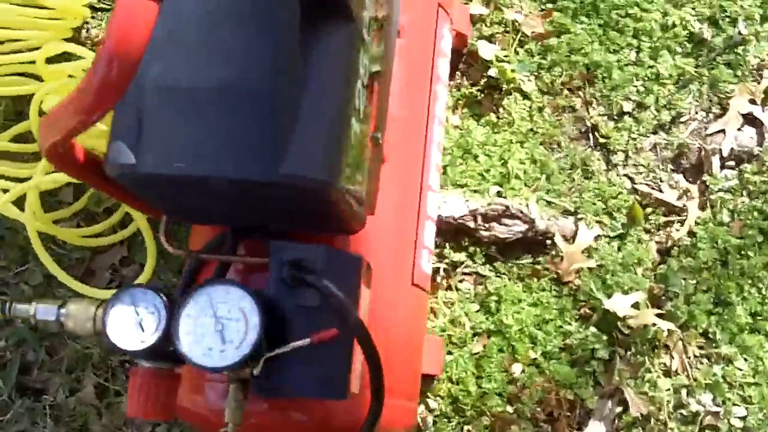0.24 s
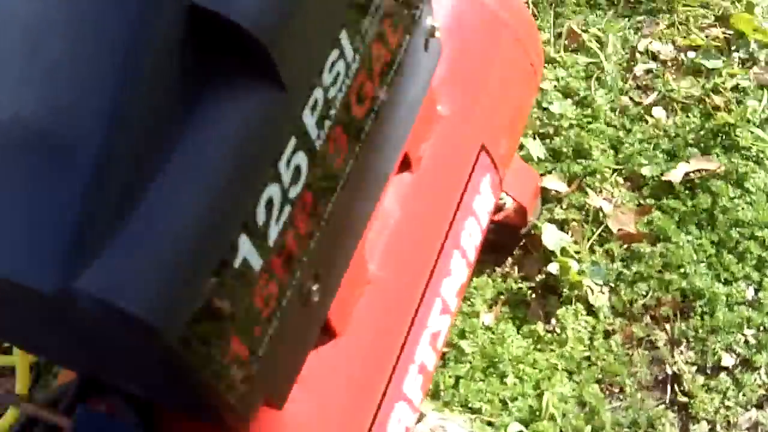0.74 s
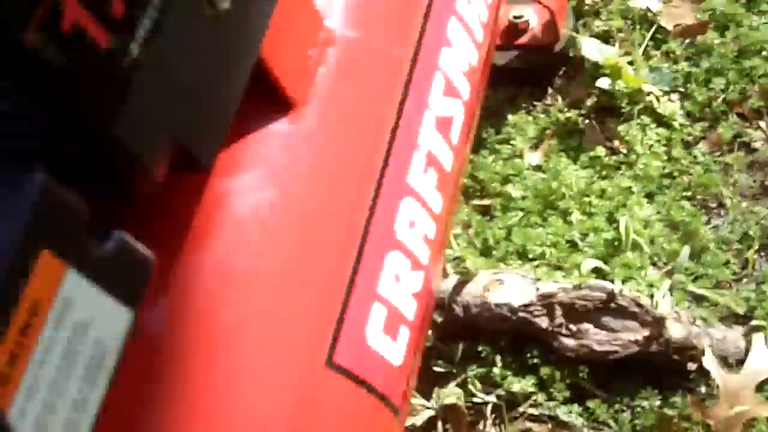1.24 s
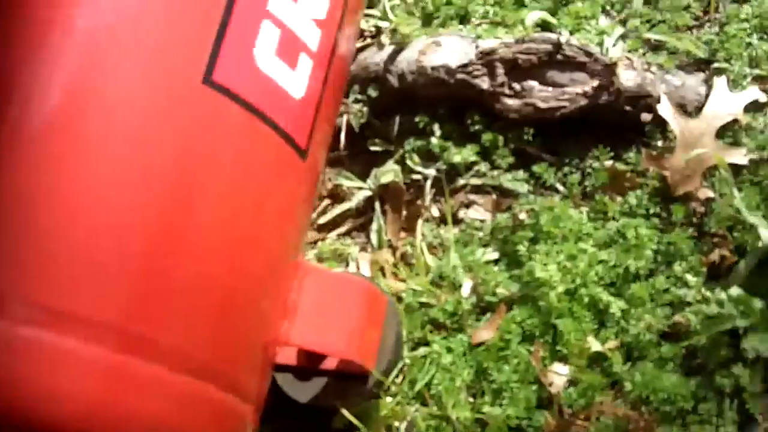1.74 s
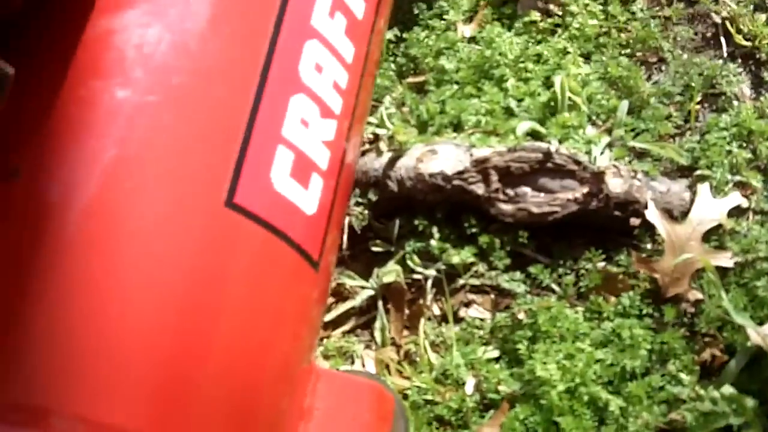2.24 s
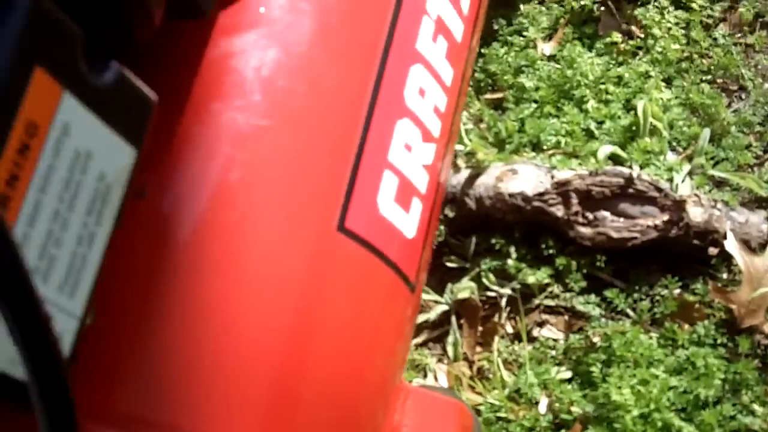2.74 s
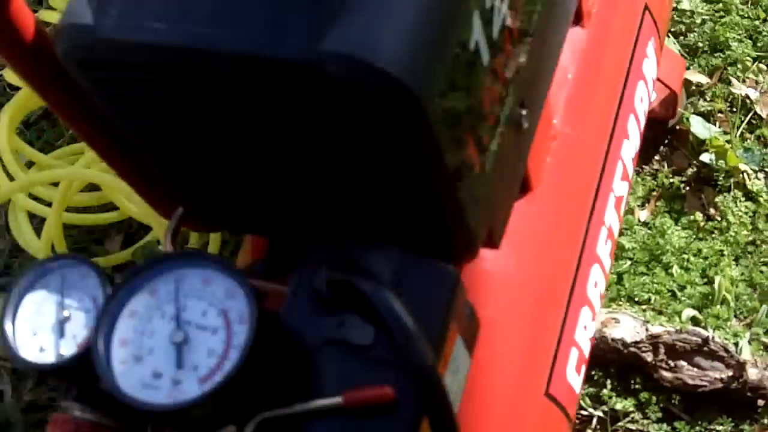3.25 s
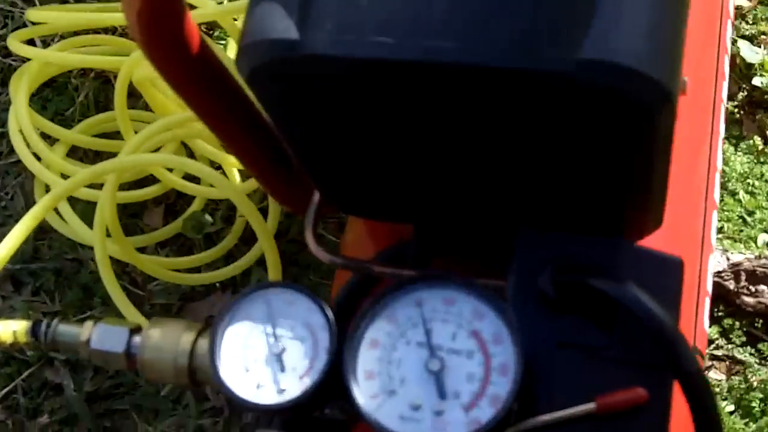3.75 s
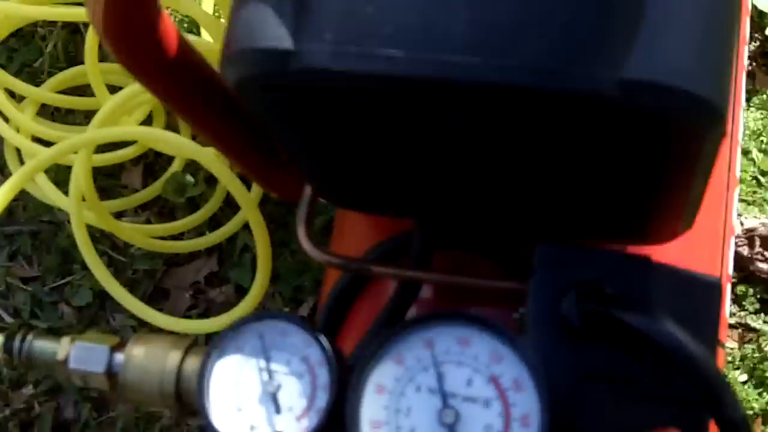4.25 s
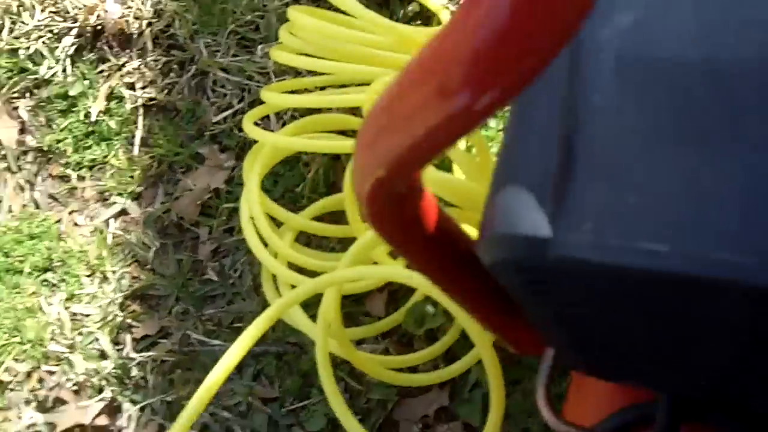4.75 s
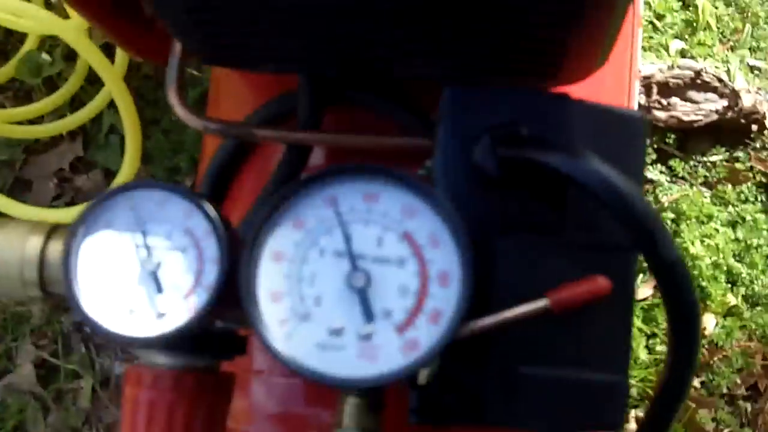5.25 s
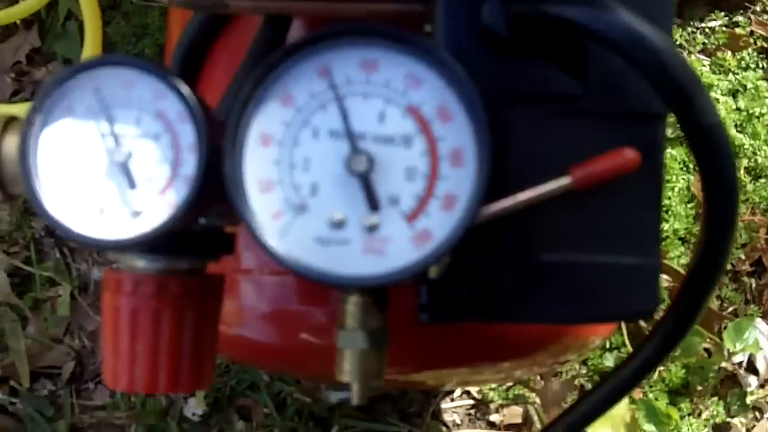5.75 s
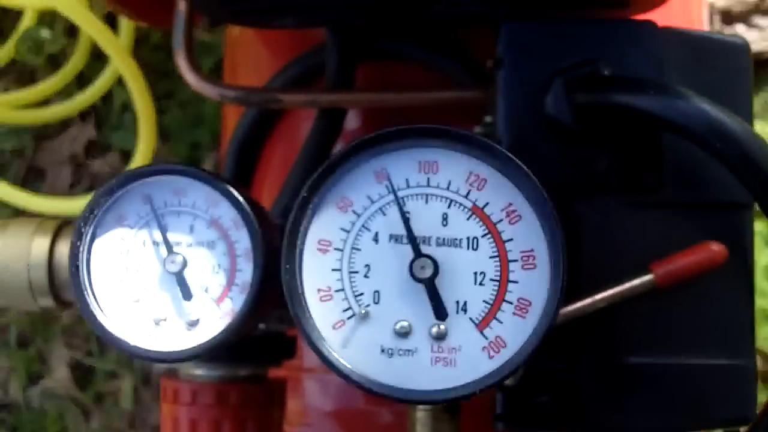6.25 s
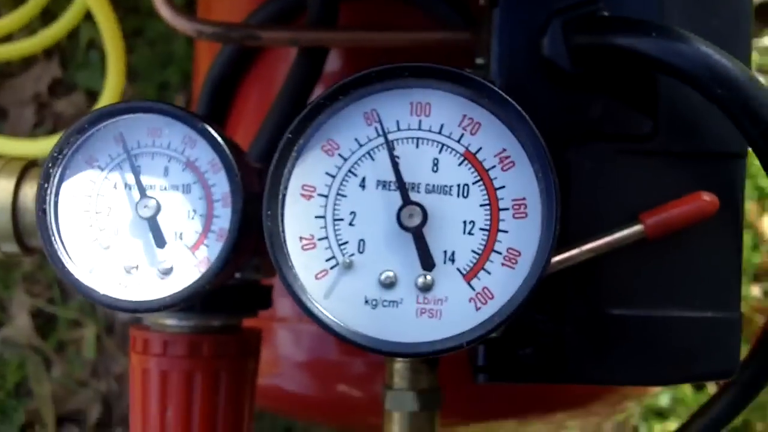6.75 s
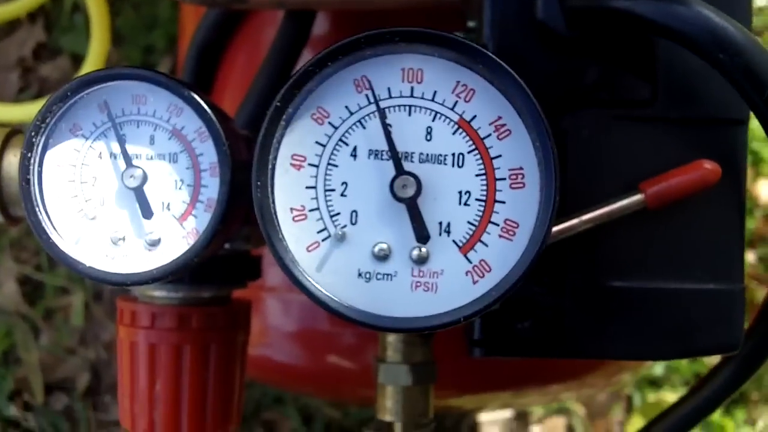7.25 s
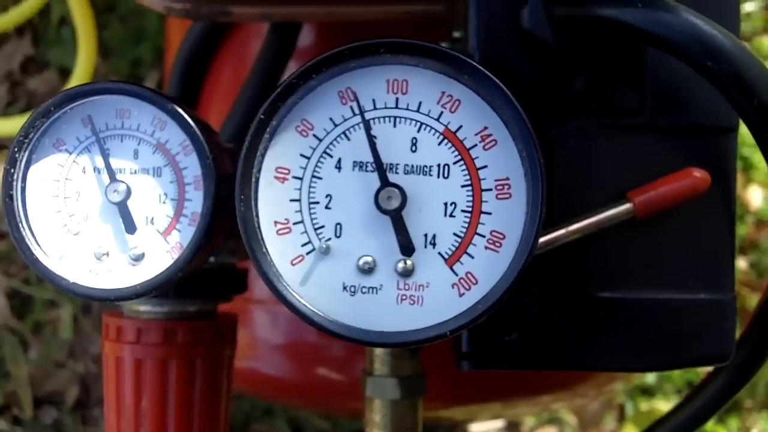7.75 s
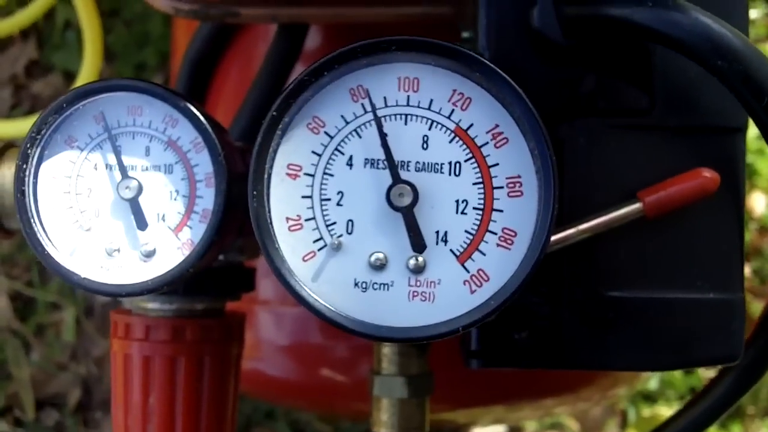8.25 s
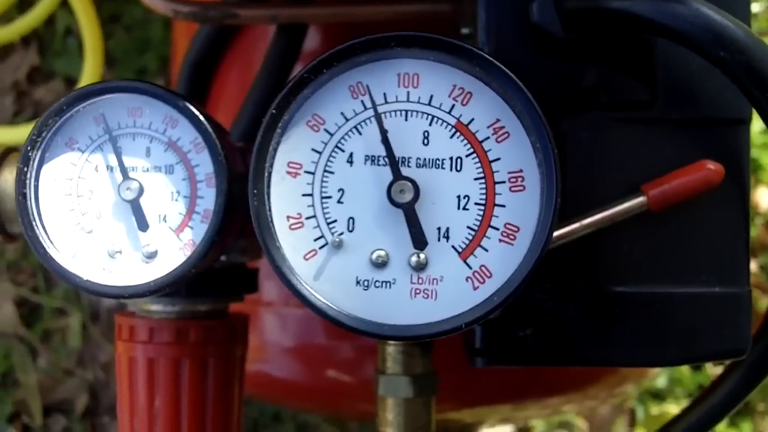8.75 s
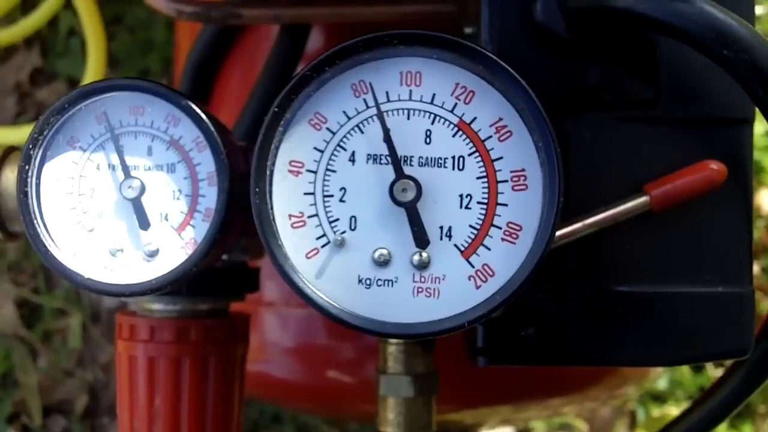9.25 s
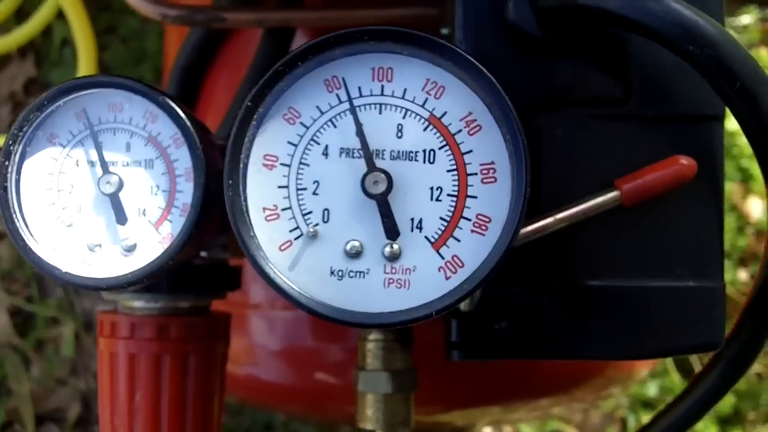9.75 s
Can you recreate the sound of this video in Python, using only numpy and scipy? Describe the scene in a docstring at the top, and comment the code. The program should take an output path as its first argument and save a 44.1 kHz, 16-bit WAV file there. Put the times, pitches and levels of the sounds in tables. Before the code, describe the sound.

A small piston air compressor runs nonstop outdoors on grass, a fast rattling drone with reedy flutter, buzz and airy hiss. The close handheld microphone moves from above the pump along the motor and tank, then back to the gauges, where the hum becomes fuller and less hissy. A sharp click on the microphone body past the middle briefly dips the level; faint breeze rumbles underneath.

```python
"""A small oil-free air compressor putters and hisses on a lawn, with one sharp click along the way.
Its piston turns about 57 times a second. Each turn gives a puff of pressure, a burst of reed-valve flutter
and buzz, a rattle and a hiss of air; these are built from crank harmonics, shaped noise and ringing modes.
The microphone moves from above the pump, past the motor, to the side of the tank, then past the motor again
to the motor cover and the gauges. A light breeze blows on it, and the click makes its limiter duck."""
import sys
import numpy as np
from scipy import signal
from scipy.fft import rfft, irfft, next_fast_len
from scipy.io import wavfile

SR = 44100
rng = np.random.default_rng(int(sys.argv[2]) if len(sys.argv) > 2 else 0)


def generate_wav(signal):
    """Clip the signal to [-1, 1] and save it as 16-bit WAV at the path in sys.argv[1]."""
    frames = np.transpose(np.atleast_2d(signal))
    scaled = np.clip(frames, -1, 1) * 32767
    pcm = np.round(scaled).astype(np.int16)
    wavfile.write(sys.argv[1], SR, pcm)


N = 440559

# How fast the crank turns: t/s, speed/(turns per s)
CRANK_SPEED = [(0.0, 57.125), (0.5, 56.928), (1.4, 56.82), (3.0, 56.84), (5.0, 56.838), (7.5, 56.843),
               (9.99, 56.848)]
# The drone heard at each place: multiple of the crank speed, relative level/dB
DRONE_ABOVE_PUMP = [(1, -6), (2, -7), (3, -8), (4, -22), (5, -11), (6, -6), (7, -5), (8, -8), (9, -7),
                    (10, -11), (11, -7), (12, -4), (13, -3), (14, 0), (15, -6), (16, -22), (17, -14),
                    (18, -17), (19, -14), (20, -11), (21, -17), (22, -16), (23, -13), (24, -13), (25, -14),
                    (26, -19), (27, -22), (28, -26)]
# the same columns, beside the tank
DRONE_BESIDE_TANK = [(1, -11), (2, -6), (3, -9), (4, -23), (5, -20), (6, -15), (7, -7), (8, -16), (9, -13),
                     (10, -2), (11, -5), (12, 0), (13, -1), (14, -9), (15, -22), (16, -12), (17, -22),
                     (18, -25), (19, -25), (20, -24), (21, -16), (22, -16), (23, -16), (24, -20), (25, -18),
                     (26, -24), (27, -25), (28, -25), (29, -21), (30, -28), (31, -27)]
# the same columns, at the motor cover
DRONE_AT_COVER = [(1, -15), (2, -12), (3, -15), (4, -25), (5, -16), (6, -13), (7, -13), (8, -18), (9, -24),
                  (10, -19), (11, -13), (12, -3), (13, 0), (14, -7), (15, -18), (16, -15), (17, -20),
                  (18, -25), (19, -29), (20, -25), (21, -27), (22, -24), (23, -29), (24, -25), (25, -25),
                  (26, -23), (27, -24), (28, -27), (29, -24), (30, -25), (31, -31), (32, -33), (33, -30),
                  (34, -29)]
# the same columns, at the gauges
DRONE_AT_GAUGES = [(1, -16), (2, -12), (3, -14), (4, -23), (5, -18), (6, -14), (7, -13), (8, -17), (9, -25),
                   (10, -10), (11, -9), (12, -3), (13, 0), (14, -7), (15, -14), (16, -13), (17, -17),
                   (18, -24), (19, -25), (20, -19), (21, -24), (22, -29), (23, -23), (24, -29), (25, -22),
                   (26, -18), (27, -21), (28, -32), (29, -25), (30, -29), (31, -34), (32, -32), (33, -28),
                   (34, -30), (35, -29), (36, -29), (37, -34)]
# the same columns, beside the motor
DRONE_BESIDE_MOTOR = [(1, -13), (2, -8), (3, -13), (4, -23), (5, -15), (6, -11), (7, -8), (8, -14),
                      (9, -12), (10, -11), (11, -10), (12, -5), (13, 0), (14, -4), (15, -14), (16, -20),
                      (17, -20), (18, -29), (19, -22), (20, -27), (21, -20), (22, -28), (23, -23),
                      (24, -16), (25, -25), (26, -21), (27, -24), (28, -22)]
# Places are numbered 0 to 4 in this order everywhere
DRONES = (DRONE_ABOVE_PUMP, DRONE_BESIDE_TANK, DRONE_AT_COVER, DRONE_AT_GAUGES, DRONE_BESIDE_MOTOR)


def from_db(db):
    """Turn decibels into a gain to multiply by."""
    return np.exp(np.asarray(db) * (np.log(10) / 20))


def rms_one(x):
    """Scale a signal to an average strength (rms) of 1."""
    return x / np.sqrt(np.mean(x ** 2) + 1e-20)


def in_time(rows):
    """Draw each column of a table as a curve in time, sample by sample."""
    s, *columns = np.transpose(rows)
    return [np.interp(np.arange(N) / SR, s, column) for column in columns]


def drift(rate_hz):
    """A smooth random wandering of rms 1: noise through a two-pole low-pass; a higher rate wanders faster."""
    step = 40  # samples between the slow values
    r = np.exp(-2 * np.pi * rate_hz * step / SR)
    draws = rng.standard_normal(N // step + 2002)
    slow = signal.lfilter([1], [1, -2 * r, r * r], draws)[2000:]  # skip the filter's start-up
    return np.interp(np.arange(N) / step, np.arange(len(slow)), rms_one(slow))


def coloured(x, spectrum, ripple_db=0):
    """Give a steady sound a spectrum, rippled at random as by reflections; rms 1."""
    size = next_fast_len(N)
    hz, db = np.transpose(spectrum)
    bins = np.maximum(np.arange(size // 2 + 1) * SR / size, 1)
    shape_db = np.interp(np.log(bins), np.log(hz), db)
    knots = np.arange(0, SR / 2, 130)  # a new ripple value every 130 Hz
    ripple = np.interp(bins, knots, rng.standard_normal(len(knots)))
    gain = from_db(shape_db + ripple_db * ripple)
    return rms_one(irfft(rfft(x, size) * gain, size)[:N])


def noise(spectrum):
    """Steady noise with this spectrum; rms 1."""
    return coloured(rng.standard_normal(N), spectrum)


def resonance(x, hz, width_hz):
    """One ringing mode driven by x: the narrower it is, the longer it rings; rms 1."""
    r = np.exp(-np.pi * width_hz / SR)
    return rms_one(signal.lfilter([1, 0, -1], [1, -2 * r * np.cos(2 * np.pi * hz / SR), r * r], x))


def swell(turn, centre, depth_db):
    """A gain that peaks once a turn; rms 1."""
    return rms_one(from_db(depth_db * np.cos(2 * np.pi * (turn - centre))))


def per_turn(turn):
    """One random value for each stroke, changing over in the quiet half of the turn."""
    draws = rng.standard_normal(1200)
    stroke = turn + 1
    # this bent count stands almost still near each stroke and hurries on halfway between
    held = stroke + np.sin(2 * np.pi * (stroke + 1 / 2)) / (2 * np.pi)
    return np.interp(held, np.arange(len(draws)), draws)


def partials(angle_of, orders, places):
    """Add up a group of crank harmonics, balanced by where the microphone is; rms about 1."""
    out, power = 0, 0
    for k in orders:
        place_gains = [from_db(np.interp(k, *np.transpose(drone))) for drone in DRONES]
        gain = np.dot(place_gains, places)
        out = out + gain * np.cos(angle_of(k))
        power = power + gain ** 2 / 2
    return out / np.sqrt(power)


def ring_lag(drone, orders):
    """Minimum phase: a resonance with this spectrum swells quickly after its kick and dies away slowly."""
    gains = from_db(np.interp(orders, *np.transpose(drone)))
    size = len(gains)
    # weak skirts on both sides, so that the group stands alone
    skirted = np.pad(gains / gains.max(), size, constant_values=.06)
    return np.imag(signal.hilbert(np.log(skirted)))[size:-size]


def reed(turn, places, rush_db):
    """The intake reed is kicked open shortly before the puff and flutters near 720 Hz, air rushing past."""
    # How long before the puff the burst is heard, one value a place: lead/(share of a turn)
    reed_lead = [0.25, 0.18, .23, 0.22, .2]
    # Air rushing through the intake: f/Hz, relative level per Hz/dB
    rush_spectrum = [(30, -13), (100, -6), (280, -4.5), (430, -2.5), (540, 4), (760, 5.5), (950, -2),
                     (1200, -20), (2000, -43)]
    orders, strongest = range(10, 18), 13  # multiples of the crank speed
    lags = dict(zip(orders, np.transpose([ring_lag(drone, orders) for drone in DRONES])))
    lead = np.dot(reed_lead, places)

    def angle_of(k):
        return 2 * np.pi * (k * turn + (k - strongest) * lead) - np.dot(lags[k], places)

    flutter = partials(angle_of, orders, places)
    strength = from_db(.25 * per_turn(turn))
    rush = noise(rush_spectrum) * swell(turn, centre=-.05, depth_db=2.0)
    return strength * flutter + from_db(rush_db) * rush


def puff(turn, places):
    """The piston's pressure pulse: the low harmonics crest together, and an echo off the tank follows."""
    echo, delay = .45, .24  # strength, share of a turn

    def angle_of(k):
        return 2 * np.pi * k * turn + np.angle(1 + echo * np.exp(-2j * np.pi * k * delay))

    return partials(angle_of, range(1, 10), places)


def reed_buzz(turn, places, rasp_db, spread):
    """The reed slaps its seat: overtones, smeared a little in time, and a rasp of noise; rms 1."""
    # Air rasping past the reed: f/Hz, relative level per Hz/dB
    rasp_spectrum = [(600, -30), (1000, -5), (1200, -1), (1420, -0.5), (1700, -7), (1950, -3.5),
                     (2200, -32), (3000, -32)]
    orders = range(18, 38)
    lag = spread * rng.standard_normal(max(orders) + 1)
    unsteady = turn + 0.00036 * per_turn(turn)  # each slap comes a touch early or late

    def angle_of(k):
        return 2 * np.pi * (k * (unsteady - .02) + lag[k])

    buzz = partials(angle_of, orders, places)
    rasp = noise(rasp_spectrum) * swell(turn, centre=0.025, depth_db=3.5)
    return rms_one(buzz + from_db(rasp_db) * rasp)


def cylinder_head(turn, places, rattle_db, shroud_db):
    """Hiss, rattle and ringing panels surge after every compression, with reflections for each place; rms 1."""
    # Hiss of the cylinder head, heard from the side: f/Hz, relative level per Hz/dB
    side_hiss = [(1500, -21), (2200, -4.5), (2700, -5.5), (3400, -2.5), (4000, -7.5), (4700, -12),
                 (5900, -4), (6600, 1.5), (7400, 0.5), (8300, -1.5), (10000, -11), (10600, -13.5),
                 (11500, -18), (15500, -33)]
    # the same columns, heard from the gauge end
    gauge_hiss = [(1500, -28), (2200, -3.5), (3000, -2), (4100, -1.5), (4700, -6), (5830, 2), (6200, 0),
                  (7100, 4.5), (8300, -0.5), (10000, -7), (12000, -14), (15500, -31)]
    # Housing tones that the crank keeps ringing, from the side: f/Hz, level against the hiss before wavering/dB
    side_tones = [(1876, -16), (1933, -17.5), (2217, -19), (3808, -14.5), (3865, -19), (4206, -18),
                  (4490, -22.5), (4945, -18.5), (6422, -15.5), (7048, -12.5)]
    # the same columns, from the gauge end
    gauge_tones = [(2330, -21), (3296, -16), (3922, -13), (4206, -16), (4490, -22.5), (4832, -24),
                   (4945, -20), (6480, -15.5), (6821, -15), (7105, -18.5), (7844, -29)]
    # Hiss over one turn: time after the puff/(share of a turn), relative level/dB
    surge_cycle = [(0, -1), (.08, 1.8), (.2, .8), (.3, 0), (.5, -2), (.8, -3.2), (.92, -2.5), (.96, .3)]
    air = 0
    for share, spectrum in zip(places, (side_hiss, side_hiss, gauge_hiss, gauge_hiss, side_hiss)):
        source = rng.standard_normal(N) + from_db(rattle_db) * rattle(turn)
        air = air + np.sqrt(share) * coloured(source, spectrum, ripple_db=2.16)

    pump, tank, cover, gauges, motor = places
    side = tank + motor
    tones = (pump + side) * housing(turn, side_tones, waver_db=2.5)
    tones += (cover + gauges) * housing(turn, gauge_tones, waver_db=2.5)

    low_ring = resonance(rng.standard_normal(N), hz=1898, width_hz=25)
    low_ring *= 0.17 * pump + 1.0 * tank + 0.87 * motor
    high_ring = resonance(rng.standard_normal(N), hz=3880, width_hz=290)
    high_ring *= 1.24 * pump + 0.9 * side + 0.91 * cover
    shroud = from_db(shroud_db + 1.9 * drift(3.6)) * (low_ring + high_ring)

    surge_db = np.interp(turn, *np.transpose(surge_cycle), period=1)
    surge_db += 0.73 * per_turn(turn) + 0.27 * drift(150)
    return rms_one((air + tones + shroud) * from_db(surge_db))


def rattle(turn):
    """Piston and bearings knock in the same way every turn: one random pattern, repeated; rms 1."""
    size = 600  # points in a turn
    knocks = np.interp(turn % 1, np.arange(size) / size, rng.standard_normal(size))
    return rms_one(signal.sosfilt(signal.butter(1, 6000, fs=SR, output="sos"), knocks))


def housing(turn, tones, waver_db):
    """Panels ring on the crank harmonic nearest to each of their modes, each wavering by itself."""
    mean_speed = np.mean(np.array(CRANK_SPEED)[:, 1])
    out = 0
    for hz, db in tones:
        level = np.sqrt(2) * from_db(db + waver_db * drift(7.4))
        harmonic = round(hz / mean_speed)
        out = out + level * np.cos(2 * np.pi * (harmonic * turn + rng.random()))
    return out


def click(decay_s, thump):
    """Something knocks against the camera body: a bright snap of a millisecond or two and a dull bump."""
    click_s, snap_peak_db = 6.4473, 3  # peak before the notch and the limiter
    age = np.clip(np.arange(N) / SR - click_s, 0, 1)
    # Ringing modes of the snap: f/Hz, relative level/dB
    modes = [(2300, -10), (3500, -9), (5000, -11), (7000, 0), (7900, -5), (10500, -12), (14300, -13)]
    ringing = sum(from_db(db) * np.sin(2 * np.pi * hz * age) for hz, db in modes)
    snap = ringing * age * np.exp(-np.minimum(age / decay_s, 50))
    bump = thump * np.sin(2 * np.pi * 22 * age) * np.exp(-age / 0.054)
    return from_db(snap_peak_db) * snap / np.max(np.abs(snap)) + bump


def breeze():
    """Light air on the microphone: low noise that slowly comes and goes."""
    # Breeze on the microphone: f/Hz, relative level per Hz/dB
    wind_spectrum = [(10, 16), (25, -19), (45, -13), (70, -23), (150, -39), (600, -70)]
    return from_db(-33 + 2.7 * drift(1.8)) * noise(wind_spectrum)


def waver():
    """A slow throb and a random waver in the loudness, in dB, as from a limiter riding the peaks."""
    throb_hz, throb_db, throb_crest_s = 2.36, 0.13, .38
    waver_db, waver_hz = 0.66, 6.4
    throb = np.cos(2 * np.pi * throb_hz * (np.arange(N) / SR - throb_crest_s))
    # the slowest wandering is left out
    wander = signal.sosfilt(signal.butter(2, 1.5, "high", fs=SR, output="sos"), drift(waver_hz))
    return throb_db * throb + waver_db * rms_one(wander)


def scene():
    """All machine parts follow one crank, and the microphone's place sets their balance; both channels match."""
    # Microphone path: t/s, place (0 above the pump, 1 beside the tank, 2 at the motor cover,
    # 3 at the gauges, 4 beside the motor)
    mic_path = [(0, 0), (.6, 0), (1.1, 4), (1.22, 4), (1.55, 1), (3.0, 1), (3.35, 4), (3.8, 2), (4.9, 2),
                (5.8, 3)]
    # Loudness of the reed along the path, before the waver: t/s, level/dB
    reed_loudness = [(0, -16), (.42, -18.5), (.55, -14.5), (.9, -16.5), (1.3, -15.8), (1.9, -17.5),
                     (3.05, -16), (3.8, -13.5), (5.1, -13.5), (6.35, -13), (7.2, -12.5), (9.99, -13)]
    # Other parts against the reed flutter, one row a place:
    # puff level/dB, reed overtones level/dB, hiss level/dB, rushing air level/dB
    place_mix = [(-2.0, -7, -6, -8.5), (-5.2, -11.5, -7.5, -13), (-8, -15, -13.5, -16.5),
                 (-8.9, -13.5, -12.5, -16), (-5.4, -12.5, -10, -13)]
    speed, = in_time(CRANK_SPEED)
    reed_db, = in_time(reed_loudness)
    turn = np.cumsum(speed) / SR + .18  # turns made so far
    # each place's share fades in and out as the microphone passes it
    places = np.array(in_time([(s, *np.eye(len(DRONES))[place]) for s, place in mic_path]))
    puff_db, buzz_db, hiss_db, rush_db = np.transpose(place_mix) @ places

    machine = reed(turn, places, rush_db)
    machine += from_db(puff_db) * puff(turn, places)
    machine += from_db(buzz_db) * reed_buzz(turn, places, rasp_db=-4.5, spread=0.18)
    machine += from_db(hiss_db) * cylinder_head(turn, places, rattle_db=-11.0, shroud_db=-9.5)
    out = from_db(reed_db + waver()) * machine
    out += click(decay_s=0.00045, thump=0.22) + breeze()
    return np.array([out, out])


def limiter(x, ceiling_db, release_db_per_s):
    """The gain drops at once on a peak over the ceiling and climbs back steadily."""
    peak_db = 20 * np.log10(np.max(np.abs(x), axis=0) + 1e-9)
    over_db = np.maximum(peak_db - ceiling_db, 0)
    ramp = release_db_per_s * np.arange(N) / SR
    return x * from_db(ramp - np.maximum.accumulate(over_db + ramp))


def record(dry):
    """The camera has a deep notch near 5.5 kHz, a limiter and a steep top cut."""
    notch = signal.iirnotch(5460, 13.0, fs=SR)
    notched = signal.lfilter(*notch, signal.lfilter(*notch, dry))  # twice, for depth
    limited = limiter(notched, ceiling_db=.4, release_db_per_s=28.0)
    top_cut = signal.cheby2(16, 70, 16100, fs=SR, output="sos")  # 70 dB down from 16100 Hz up
    return signal.sosfilt(top_cut, limited)


dry = scene()
out = record(dry)
generate_wav(out)
```